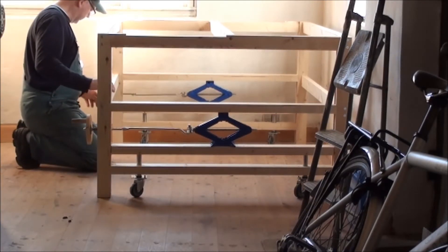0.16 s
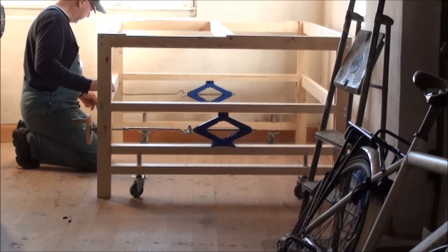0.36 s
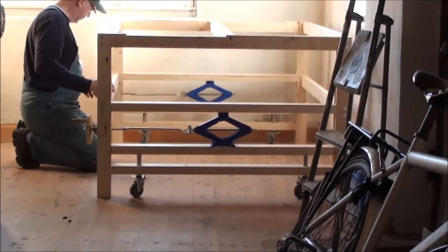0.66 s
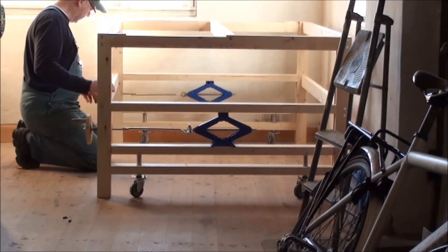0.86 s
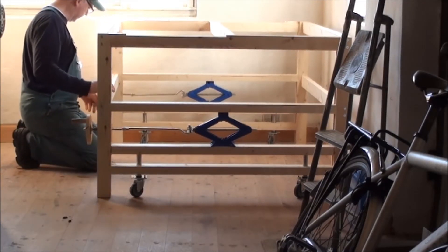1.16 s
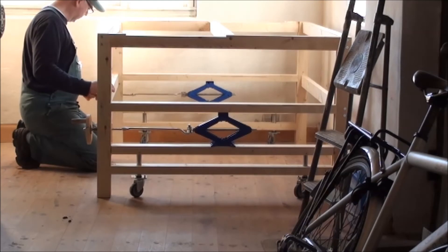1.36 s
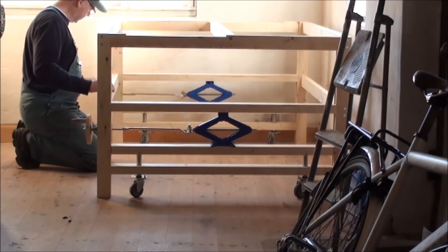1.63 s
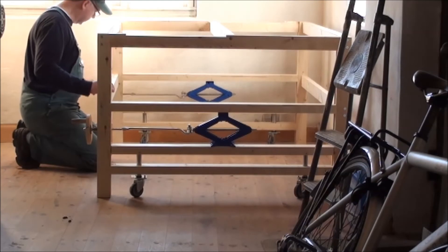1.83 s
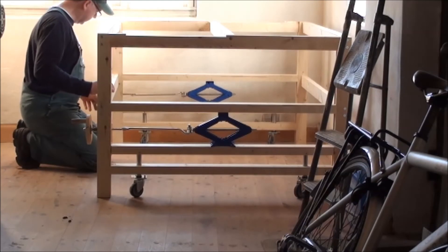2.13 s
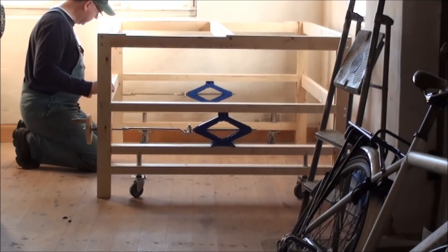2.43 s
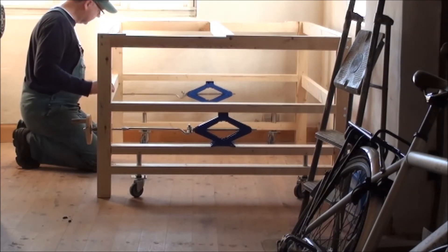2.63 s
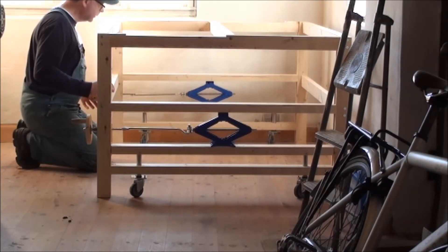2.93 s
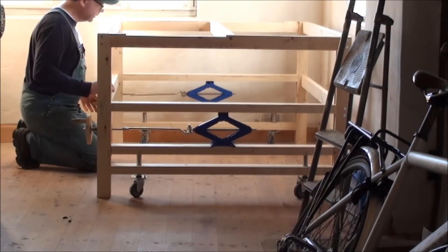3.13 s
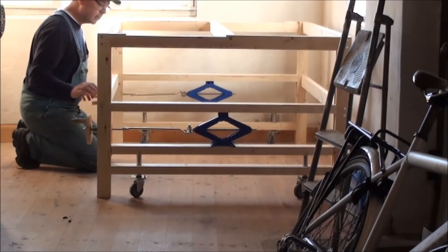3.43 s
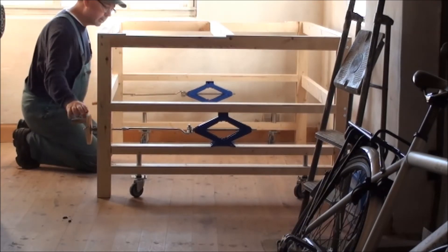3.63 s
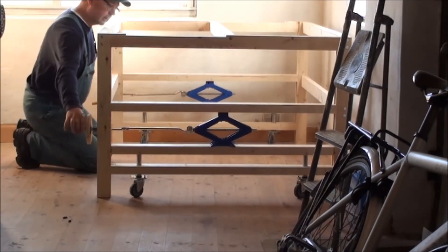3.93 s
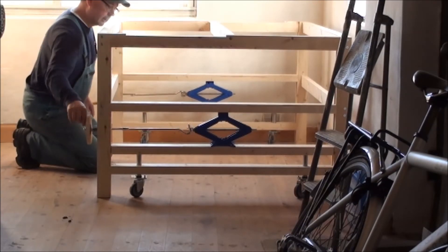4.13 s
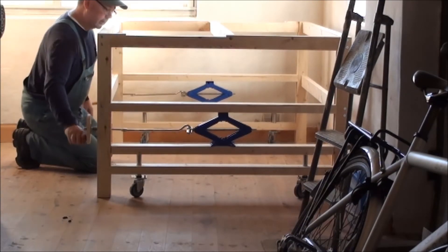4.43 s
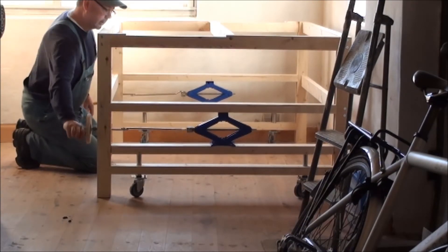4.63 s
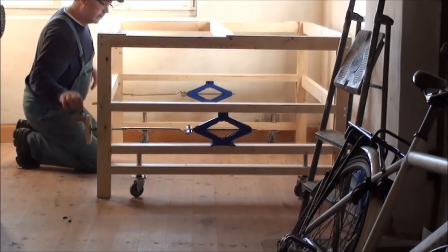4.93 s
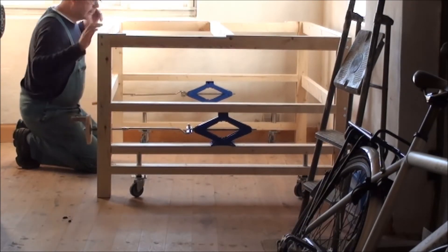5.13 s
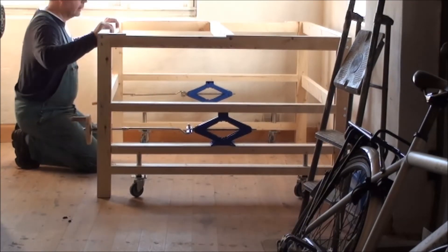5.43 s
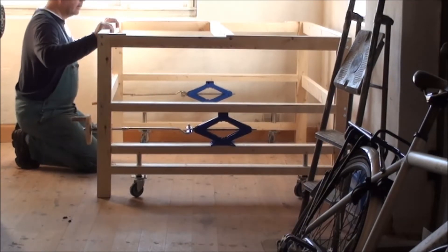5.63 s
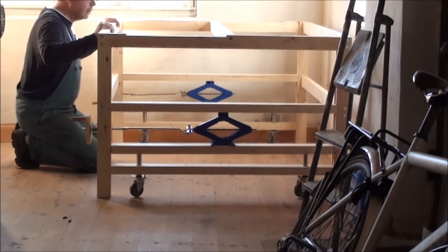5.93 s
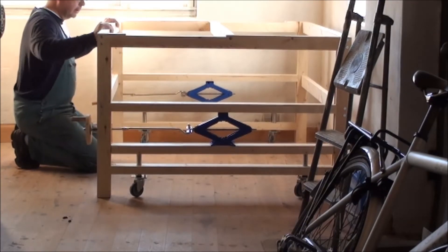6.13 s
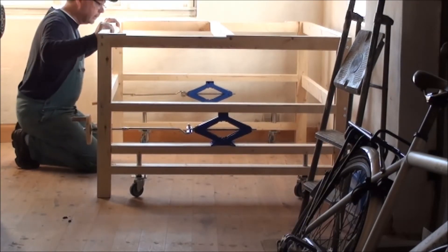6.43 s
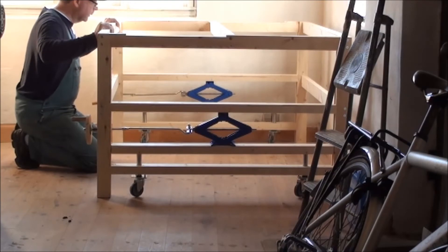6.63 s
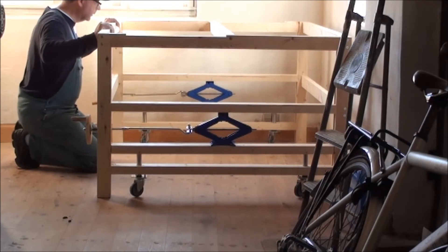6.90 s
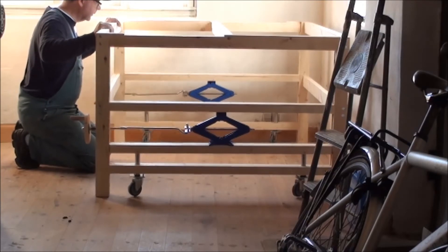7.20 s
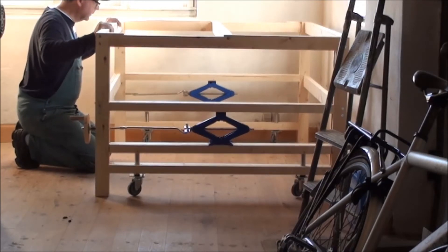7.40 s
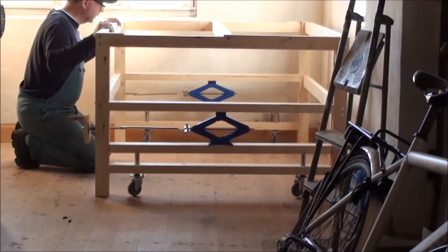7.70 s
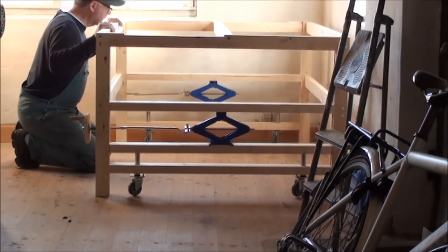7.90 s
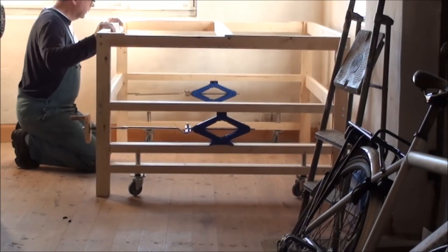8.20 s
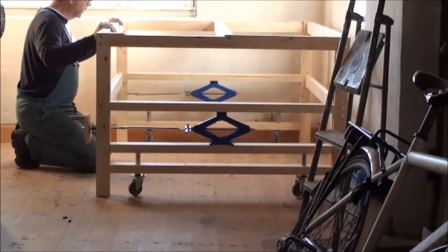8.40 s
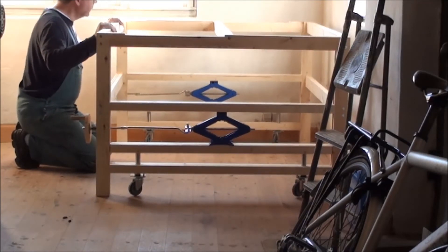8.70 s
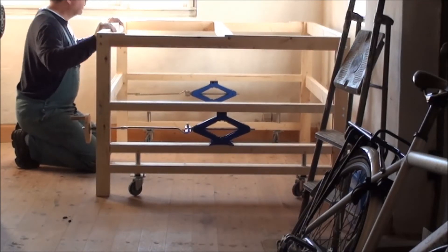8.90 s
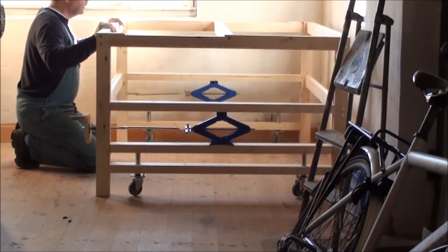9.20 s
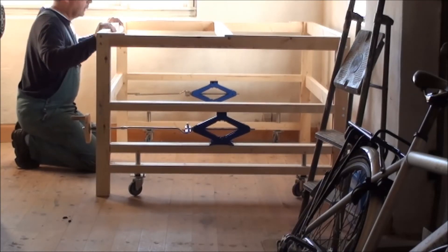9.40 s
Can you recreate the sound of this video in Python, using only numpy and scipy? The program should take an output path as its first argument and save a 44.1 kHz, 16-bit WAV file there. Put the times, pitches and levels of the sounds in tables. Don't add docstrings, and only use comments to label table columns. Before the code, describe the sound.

Hand-cranked steel jack clanks and knocks a wooden table in a live workshop, a squeak, heavy thumps, a castor scrape and sharp cracks.

```python
import sys
import numpy as np
from scipy import signal
from scipy.fft import rfft, irfft, next_fast_len
from scipy.io import wavfile
from scipy.ndimage import uniform_filter1d, map_coordinates

SR = 44100
rng = np.random.default_rng(int(sys.argv[2]) if len(sys.argv) > 2 else 0)


def store_wav(level_fs):
    pcm = np.round(np.clip(np.atleast_2d(level_fs), -1, 1) * 32767)
    wavfile.write(sys.argv[1], SR, pcm.T.astype(np.int16))


def convert_level_to_amplitude(level_db):
    exponent = np.asarray(level_db, float) / 20
    return 10 ** exponent


N = 421140


def unit(x):
    return x / np.sqrt(np.mean(x ** 2) + 1e-20)


def loudest(x):
    return x * np.sqrt(SR / 10) / np.linalg.norm(x)


def along(points, hz):
    f, v = np.transpose(points)
    return np.interp(np.log(hz + 1), np.log(f + 1), v)


def curves(rows):
    s, *cols = np.transpose(rows)
    return [np.interp(np.arange(N) / SR, s, c) for c in cols]


def wobble(rate_hz):
    knots = rng.standard_normal(int(N * rate_hz / SR) + 4)
    return map_coordinates(knots, [np.arange(N) * rate_hz / SR])


def filtered(x, response):
    m = next_fast_len(x.shape[-1] + 8192)
    return irfft(rfft(x, m) * response(np.fft.rfftfreq(m, 1 / SR)), m)[..., :x.shape[-1]]


def resonances(modes):
    def response(f):
        return sum((-1) ** k * convert_level_to_amplitude(db) * 1j * f * w / (c * c - f * f + 1j * f * w)
                   for k, (c, w, db) in enumerate(modes))
    return response


def noise(spectrum, side):
    def response(hz):
        return convert_level_to_amplitude(along(spectrum, hz)) * [np.ones_like(hz), convert_level_to_amplitude(along(side, hz))]
    mid, dif = filtered(rng.standard_normal((2, N)), response)
    return unit(np.array([mid + dif, mid - dif]))


def burst(seconds):
    t = np.arange(SR // 4) / SR
    fade = np.exp(-t / max(seconds, .001)) * (1 - np.exp(-t / 0.00082))
    z = rfft(rng.standard_normal(len(t)) * fade)
    return irfft(z / np.abs(z), len(t)) * np.sqrt(fade)


def add(out, s, x):
    part = out[:, round(s * SR):][:, :x.shape[1]]
    part += x[:, :part.shape[1]]


# (frequency [Hz], t60 [s])
ROOM_T60_S = [(50, 0.34), (150, 0.44), (400, 0.68), (1000, 0.51), (3000, 0.52), (7000, 0.37), (13000, 0.25)]
# (frequency [Hz], side minus mid [dB])
ROOM_SIDE_DB = [(60, -20), (250, -16.5), (1000, -13.5), (3000, -11), (8000, -13), (13000, -21)]
ECHO_SAMPLES = 3 * SR // 4


def workshop(x, direct_db):
    hz = np.fft.rfftfreq(256, 1 / SR)
    t = np.arange(ECHO_SAMPLES // 128 + 2) * 128 / SR
    z = rng.standard_normal((2, len(hz), 2 * len(t))).view(complex)
    z = z * convert_level_to_amplitude(-60 * t / along(ROOM_T60_S, hz)[:, None])
    z[1] *= convert_level_to_amplitude(along(ROOM_SIDE_DB, hz))[:, None]
    tail = signal.istft(z, SR, nperseg=256)[1][:, :ECHO_SAMPLES]
    tail = tail * (1 - np.exp(-np.arange(ECHO_SAMPLES) / SR / 0.0025))
    tail = tail / np.linalg.norm(tail[0])
    tail[0, 0] = convert_level_to_amplitude(direct_db)
    mid, dif = signal.fftconvolve(x[None], tail, axes=1)
    return np.array([mid + dif, mid - dif])


# (time [s], peak [dB], board share [dB], body [Hz], board [Hz])
KNOCKS = [(0.0, -24.5, 4, 168, 810), (0.199, -31.5, 2.5, 440, 756), (0.406, -34.5, 7, 264, 1200),
          (0.534, -28, 4.5, 169, 1490), (0.721, -25, 1.5, 186, 730), (3.793, -22, -24, 317, 1880),
          (4.018, -41, 7.5, 222, 1980), (4.121, -31.5, 5.5, 81.4, 1550), (4.151, -24, 0.5, 406, 964),
          (6.147, -8, -12, 313, 685), (6.219, -12.5, -52, 238.7, 738), (6.316, -19.5, -19, 221, 670),
          (7.281, -9.5, -30, 305, 810), (7.329, -14, -5.5, 208, 925), (7.418, -19, -7, 243, 1580),
          (7.914, -37, 21.5, 456, 2200), (7.984, -28.5, 6, 96.9, 890), (8.072, -35, 13, 304, 740)]
# (time [s], peak [dB], board share [dB], body [Hz])
NUDGES = [(0.628, -47, 23, 315), (0.875, -40, -14, 342), (1.218, -42.5, 12.5, 450), (1.326, -40.5, 2, 92),
          (1.54, -41.5, -7, 180), (1.815, -48.5, -1, 339), (1.933, -43.5, -2, 357), (2.065, -60, -10, 361),
          (2.404, -37, -13, 330), (2.593, -46, -21, 95), (2.703, -38.5, -1.5, 378), (2.81, -43, -5, 152),
          (3.217, -37.5, -4.5, 192), (3.249, -37.5, -7.5, 175), (4.731, -38, 2, 334),
          (5.062, -40.5, -5.5, 162), (5.389, -37, -11, 93), (5.429, -47.5, 4, 93.5), (5.977, -46, -3, 326)]
NUDGE_HZ = 810
# (time [s], peak [dB], board share [dB])
RAPS = [
    (6.137, -27, 9.4),
    (7.277, -32.5, 23.3),
    (7.905, -37, 15),
]
RAP_HZ, RAP_S = 706, 0.004
# (time [s], peak [dB])
BOUNCES = [
    (3.85, -65),
    (4.149, -54),
    (6.36, -23.5),
    (8.122, -35),
]
BOUNCE_HZ, BOUNCE_S = 53, 0.033
CONTACT_S, SOFTER_DB_PER_DB = 0.0047, 0.42


def frame_blows():
    blows = KNOCKS + [(*row, NUDGE_HZ) for row in NUDGES]
    blows = [(*row, CONTACT_S * convert_level_to_amplitude(-SOFTER_DB_PER_DB * row[1])) for row in blows]
    raps = [(*row, 440, RAP_HZ, RAP_S) for row in RAPS]
    bounces = [(*row, -30, BOUNCE_HZ, RAP_HZ, BOUNCE_S) for row in BOUNCES]
    return blows + raps + bounces


# (frequency [Hz], width [Hz], level [dB])
TABLE_MODES = [(55.6, 13, 0), (97, 17, -3.5), (140.5, 21.3, 2), (198, 25.2, 1.5), (280, 70, -4),
               (347.6, 32.6, 1), (456, 78, -5.5)]
# (frequency [Hz], width [Hz], level [dB])
BOARD_MODES = [(508, 860, -4.5), (760, 82, 5), (890, 68, 1.5), (1080, 244, 2), (1456, 330, -1.5),
               (1880, 180, 2.5), (2430, 990, -6.5)]


def knocks():
    out = np.zeros((2, N))
    table, boards = resonances(TABLE_MODES), resonances(BOARD_MODES)
    for s, db, board_db, body_hz, board_hz, contact_s in frame_blows():
        force = burst(contact_s)
        near = resonances([(body_hz, 0.35 * body_hz, 0)])
        rap = resonances([(board_hz, 0.55 * board_hz, 0)])
        body = filtered(force, lambda f: table(f) * (0.42 + near(f)) / (1 + 1j * f / 1500))
        board = filtered(force, lambda f: boards(f) * (0.086 + rap(f)) / (1 + 1j * f / (2.8 * board_hz)) ** 2)
        blow = loudest(body) + convert_level_to_amplitude(board_db - 4) * loudest(board)
        add(out, s, workshop(convert_level_to_amplitude(db - 14.0) * blow, direct_db=-1.0))
    return out


# (time [s], level [dB])
RESTLESS_DB = [(0, -71), (0.9, -58), (2.2, -64.5), (3.8, -67.5), (4.55, -61), (5.9, -62.5), (7, -63.5),
               (8.4, -66.5), (9.55, -70)]
# (time [s], thud [dB], cloth [dB], rise [dB/s], fall [dB/s])
SHIFTS = [
    (0, -35.5, -35, 60, 50),
    (.69, -39, -35.5, 48, 117),
    (2.66, -55.5, -56, 10, 13.5),
    (4.07, -44, -40.5, 106, 29),
    (6.33, -41.5, -73, 102.5, 57),
    (7.39, -31, -26, 159, 104),
    (8.08, -46, -36, 200, 104),
]
# (frequency [Hz], density [dB/Hz])
THUD_DB = [(18, -55), (30, -6), (92, -8), (162, -3.5), (238, -12), (357, -6), (397, -10), (700, -16),
           (910, -49), (1540, -120)]
# (frequency [Hz], density [dB/Hz])
CLOTH_SPECTRUM_DB = [(350, -49), (600, -1.5), (1090, 0.5), (1470, -9.5), (1680, -4.5), (5000, -15),
                     (6500, -41.5), (11000, -120)]
# (frequency [Hz], width [Hz], level [dB])
SCREW_MODES = [(1640, 70, 6), (1120, 50, 7)]
CLOTH_DB = -1.5


def shuffle():
    t, restless = np.arange(N) / SR, convert_level_to_amplitude(curves(RESTLESS_DB)[0])
    knees, sleeves = restless, restless * convert_level_to_amplitude(CLOTH_DB)
    for s, thud_db, cloth_db, rise, fall in SHIFTS:
        swell = convert_level_to_amplitude(-np.maximum(rise * (s - t), fall * (t - s)))
        knees = np.hypot(knees, convert_level_to_amplitude(thud_db) * swell)
        sleeves = np.hypot(sleeves, convert_level_to_amplitude(cloth_db) * swell)
    thud = knees * convert_level_to_amplitude(2.5 + 1.4 * wobble(8.3)) * noise(THUD_DB, ROOM_SIDE_DB)
    screw = resonances(SCREW_MODES)
    cloth = unit(filtered(noise(CLOTH_SPECTRUM_DB, ROOM_SIDE_DB), lambda f: 1 + screw(f)))
    return thud + sleeves * convert_level_to_amplitude(0.48 * wobble(11.0)) * cloth


# (time [s], hiss [dB])
GAIN_DB = [(0.0, -57), (0.24, -58.5), (2.4, -60), (3.56, -61.5), (4.65, -56.5), (6.1, -61), (7.32, -62.5),
           (7.5, -66.5), (9.55, -64.5)]
# (frequency [Hz], density [dB/Hz])
HISS_DB = [(18, -40.5), (30, -11), (270, 2), (300, -4), (411, 0), (1650, -4), (1830, -4), (2380, -4),
           (4450, -7), (5070, -6), (6420, -7), (7320, -6), (15600, -9.5)]
# (frequency [Hz], side minus mid [dB])
HISS_SIDE_DB = [(60, -18.5), (110, -16), (200, -6), (380, -0.5), (700, 1), (1290, 1), (2380, -3),
                (4400, -5.5), (8120, -8.5), (15000, -18)]
# (start [s], end [s], tick [dB])
FOCUS = [
    (1.442, 1.59, -45.5),
    (4.93, 5.31, -41.5),
    (5.697, 6.515, -44.5),
    (8.603, 9.546, -49),
]
# (time [s], peak [dB])
SNAPS = [
    (6.568, -30),
    (8.5664, -37),
    (8.975, -43),
]
# (frequency [Hz], width [Hz], level [dB])
HOUSING_MODES = [(2890, 470, -3), (4200, 400, -6.5), (5100, 260, -2), (7340, 870, 0), (8340, 1700, -4)]
TICKS_HZ = 50


def camera():
    steps = np.zeros(N)
    at = (np.arange(.0175, N / SR, 1 / TICKS_HZ) * SR).astype(int)
    hunting = sum(convert_level_to_amplitude(db) * (at > start * SR) * (at < end * SR) for start, end, db in FOCUS)
    steps[at] = hunting * convert_level_to_amplitude(1.8 * rng.standard_normal(len(at)))
    for s, db in SNAPS:
        steps[round(s * SR)] = convert_level_to_amplitude(db + 0.5)
    tick = filtered(burst(0.0016)[:SR // 50], resonances(HOUSING_MODES))
    ticks = signal.fftconvolve(steps, tick / np.abs(tick).max())[:N]
    return convert_level_to_amplitude(curves(GAIN_DB)[0] + 9) * noise(HISS_DB, HISS_SIDE_DB) + ticks


# (time [s], peak [dB], brightness [dB/octave], own ring [Hz], rattle [s])
CLANKS = [(0.0004, -14, 0, 2830, 0.0036), (0.18, -31, -3, 9350, 0.04), (0.3892, -30, 6.5, 4200, 0.044),
          (0.5178, -14.5, -3, 3070, 0.022), (0.7123, -17, -2, 5330, 0.0033),
          (3.175, -37, -3.5, 2660, 0.023), (3.7793, -12.5, -2.5, 4700, 0.049),
          (3.998, -31, -3, 2290, 0.017), (4.1092, -10.5, -2, 2870, 0.02), (5.1151, -24.5, 3, 5100, 0.0094),
          (5.362, -33.5, 1.5, 1630, 0.12), (5.579, -40.5, 5, 3450, 0.013), (5.973, -33, -1.5, 5100, 0.043),
          (7.2969, -14.5, 9, 2580, 0.02), (7.3475, -15.5, 11.5, 3590, 0.003),
          (7.908, -12.5, 12, 3950, 0.019), (7.9297, -13, -6.5, 2080, 0.026), (7.9888, -28, 1, 2400, 0.018),
          (8.075, -27, 6.5, 2900, 0.0062), (8.976, -42.5, 17, 4940, 0.013)]
# (time [s], peak [dB], brightness [dB/octave], own ring [Hz])
TOUCHES = [(1.214, -31.5, -5, 2560), (2.378, -35.5, -5.5, 1920), (2.70, -42.5, 3, 1800),
           (3.751, -16.5, -7, 4000), (3.764, -28.5, -3, 4200), (4.1, -37.5, 8.5, 4100),
           (4.731, -31, -5, 1700), (7.897, -26, -5.5, 3020)]
# (frequency [Hz], density [dB/Hz])
STEEL_DB = [(290, -19.5), (500, -5.5), (1220, -6), (1580, -6), (2160, -7), (2690, -6), (2970, -11),
            (4500, -5), (5130, -6.5), (6740, -4.5), (8000, -2.5), (15500, -29.5)]
# (frequency [Hz], density [dB/Hz])
CASTORS_DB = [(290, -39.5), (500, -14), (827, -32), (888, 9.5), (1040, -29), (1650, -6), (3060, -14.5),
              (7780, -9), (11500, -25), (14000, -41.5), (15500, -59)]
# (frequency [Hz], width [Hz], level [dB])
SHADOW_MODES = [(5210, 570, -4.5)]
ROD_HZ, TOUCH_S = 7640, 0.019
ROLLS_FROM_S = 7


def clanks():
    out = np.zeros((2, N))
    shadow = resonances(SHADOW_MODES)
    for s, db, tilt_db, low_hz, rattle_s in CLANKS + [(*row, TOUCH_S) for row in TOUCHES]:
        on_rod = s < ROLLS_FROM_S
        part = STEEL_DB if on_rod else CASTORS_DB
        rings = resonances([(low_hz, 600, 6), (ROD_HZ, 1200, 5)])

        def response(f):
            tilted = convert_level_to_amplitude(along(part, f) + tilt_db * np.log2((f + 1) / 5000))
            return tilted * (1 + rings(f)) * (1 - on_rod * shadow(f))

        force = loudest(burst(rattle_s)) + convert_level_to_amplitude(-7.0) * loudest(burst(0.00079))
        steel = loudest(filtered(force, response))
        add(out, s, workshop(convert_level_to_amplitude(db - 17.0) * steel, direct_db=-5.5))
    return out


# (time [s], frequency [Hz], level [dB], t60 [s])
RINGS = [(0.0012, 1686, -36.5, 0.17), (0.00089, 1149, -36.5, 0.028), (.001, 7100, -38, 0.067),
         (3.18, 3000, -61, 0.022), (5.118, 4200, -48, 0.13), (5.116, 5150, -50, 0.14),
         (5.125, 7600, -45.5, 0.045), (5.117, 11300, -51, .08), (7.2, 1205, -47, 0.19),
         (7.297, 5970, -35, 0.18), (7.348, 4090, -35, 0.47), (7.36, 1610, -29.5, 0.4),
         (4.528, 4490, -29, .1), (2.55, 1800, -74, .4), (3.05, 2000, -61, 0.43)]
# (time [s], frequency [Hz], level [dB], t60 [s])
BOOMS = [(0.209, 150.6, -44.5, 0.43), (1.861, 354.6, -52, 0.53), (2.592, 97, -46, 0.094),
         (2.703, 1120, -57, .14), (2.704, 364.5, -44.5, 0.49), (3.243, 158, -54, 0.27),
         (3.796, 309, -36, 0.25), (5.388, 88.4, -47.5, 0.26), (6.138, 760, -33, 0.05),
         (6.151, 97, -21.5, 0.15), (7.285, 97, -26.5, 0.15), (7.299, 198, -51, .4), (7.906, 802, -36, 0.15),
         (7.985, 894, -35, 0.6)]


def ringing():
    out, t = np.zeros((2, N)), np.arange(SR // 2) / SR
    for s, hz, db, t60 in RINGS + BOOMS:
        split, start = rng.standard_normal((2, 14, 1))
        modes_hz = hz * (1 + .021 * split)
        cluster = np.sin(2 * np.pi * (modes_hz * t + start)).sum(axis=0) * (1 - np.exp(-t / 0.0031))
        ring = workshop(convert_level_to_amplitude(-60 * t / t60) * cluster, direct_db=5.0)
        add(out, s, convert_level_to_amplitude(db + 3.0) * loudest(ring))
    return out


# (time [s], level [dB], rattle [s])
STRUCK = [
    (.518, -32.5, 0.0077),
    (.713, -34.5, .003),
    (3.778, -29, 0.004),
    (4.108, -24, .012),
    (7.909, -29, .015),
]
# (frequency [Hz], level [dB], t60 [s])
HANDLE = [(1444, -1, 0.24), (1658, -1, 0.41), (2821, -1.5, 0.34), (3295, -6, 0.13), (4420, -8.5, 0.26),
          (6020, -5.5, 0.15), (6632, -3.5, .3), (6930, -12, 0.57), (8020, -6, .2), (8600, -13, 0.17),
          (9180, -8, 0.13)]
SOCKET = [(1767, -4, 0.24), (2430, -7.5, 0.21), (3871, -8, 0.25), (4447, -14, .3), (5160, -3.5, .25),
          (5920, -10.5, .3), (6503, -0.5, 0.23), (7520, -2.5, 0.26), (8330, 0, 0.11)]
JACK_MODES = [(1850, -8.5, 0.36), (3224, -8.5, 1), (3940, -8.5, 0.52), (4210, -2.5, 0.42), (4550, -16, 0.43),
              (5680, -5, 0.19), (6200, -14, 0.24), (7040, -11, 0.34), (7710, -0.5, 0.073), (9470, -6, 0.1)]
ROD_MODES = [(1318, -15, 0.63), (1523, -1, .4), (2658, -6.5, 0.32), (3618, -4.5, 0.49), (4560, 1, 0.53),
             (5920, -9, 0.21), (6440, 0.5, 0.49), (6870, -11, 0.31), (6953, -6.5, 0.3), (7500, -10, 0.37),
             (8000, -11, 0.21)]
FORK = [(1200, -5, 0.17), (1413, -1, 0.57), (1700, -8.5, 0.37), (1962, -3.5, 0.25), (3225, -10.5, .4),
        (3950, -10, 0.23), (4608, -11, 0.24), (6100, -7, 0.35), (7200, -7, .18), (7994, -5, 0.18),
        (9000, -8, 0.18)]
DAMPED, SPREAD = .3, .022
STEEL_TOP_HZ = 10700


def chimes():
    out = np.zeros((2, N))
    for (s, db, rattle_s), modes in zip(STRUCK, [HANDLE, SOCKET, JACK_MODES, ROD_MODES, FORK]):
        bands = [(hz, np.log(1000) / np.pi / (DAMPED * t60) + SPREAD * hz, level) for hz, level, t60 in modes]
        part = resonances(bands)
        chime = filtered(burst(rattle_s), lambda f: part(f) / (1 + (f / STEEL_TOP_HZ) ** 6))
        add(out, s, workshop(convert_level_to_amplitude(db) * loudest(chime), direct_db=-7))
    return out


# (time [s], peak [dB], centre [Hz])
CRACKS = [(3.7648, -30, 12000), (4.116, -26, 4000), (4.54, -38, 10000), (7.2864, -22.5, 9000),
          (7.2972, -16, 9000), (7.325, -19, 8000), (7.348, -15.5, 9950), (7.9099, -3.5, 9000),
          (7.928, -14, 5000), (7.9431, -17, 4000), (7.968, -14.5, 3980), (8.0765, -21.5, 8970),
          (8.093, -25, 2500)]


def cracks():
    out, t = np.zeros((2, N)), np.arange(SR // 100) / SR
    for s, db, hz in CRACKS:
        push = np.sin(2 * np.pi * hz * t) * np.exp(-.9 * hz * t) * (1 - np.exp(-3 * hz * t))
        add(out, s, convert_level_to_amplitude(db - 5) * workshop(push, direct_db=8.5))
    return out


def chirp(s, length_s, first_hz, last_hz, db):
    edge_s, octave_db = 0.0036, -4.5
    at = np.array([0, edge_s, length_s - edge_s, length_s])
    hz = np.interp(at, [0, length_s], [first_hz, last_hz])
    return np.transpose([s + at, hz, db - np.array([32, 1.0, 2.5, 7.5]), np.full(4, octave_db)])


# (time [s], length [s], first pitch [Hz], last pitch [Hz], level [dB])
CHIRPS = [
    (3.998, 0.024, 2486, 1940, -30.5),
    (4.695, 0.037, 3620, 3540, -45),
]
# (time [s], pitch [Hz], level [dB], octave [dB])
LONG_SQUEAK = [(4.382, 3880, -47, -5), (4.388, 4096, -30.5, -2), (4.405, 4527, -30.5, 1.5),
               (4.425, 4684, -31.5, -5.5), (4.44, 4734, -23.5, -11.5), (4.458, 4740, -29.5, -2),
               (4.471, 4810, -41.5, 11), (4.488, 4693, -41, 5), (4.503, 4510, -32.5, 0),
               (4.517, 4480, -27, -2), (4.526, 4100, -31, -20), (4.536, 3350, -34.5, -10),
               (4.545, 2780, -35, 3)]
WAVER = [.35, .1, .19]
THIRDS_DB = [-6, -16.5, -21.5]
HALF_HZ, HALF_DB, HALF_SOFT_HZ = 4610, -10, 30
FLUTTER_DB = 2


def squeaks():
    out = np.zeros((2, N))
    for rows, waver, third_db in zip([chirp(*CHIRPS[0]), LONG_SQUEAK, chirp(*CHIRPS[1])], WAVER, THIRDS_DB):
        s, hz, *levels = np.transpose(rows)
        t = np.arange(s[0], s[-1], 1 / SR)
        pitch_hz = np.interp(t, s, hz)
        level, octave = [convert_level_to_amplitude(np.interp(t, s, db)) for db in levels]
        half = convert_level_to_amplitude(HALF_DB) * (1 + np.tanh((pitch_hz - HALF_HZ) / HALF_SOFT_HZ)) / 2
        jitter = uniform_filter1d(rng.standard_normal(len(t)), size=40) * waver
        phase = 2 * np.pi * np.cumsum(pitch_hz * (1 + jitter)) / SR
        upper = np.sin(3 * phase) + 0.46 * np.sin(4 * phase)
        tone = np.sin(phase) + octave * (np.sin(2 * phase) + convert_level_to_amplitude(third_db) * upper)
        flutter = unit(uniform_filter1d(rng.standard_normal(len(t)), size=350))
        level = level * convert_level_to_amplitude(FLUTTER_DB * flutter)
        halves = 0.07 * np.sin(phase / 2) + np.sin(phase * 3 / 2) + 0.33 * np.sin(phase * 5 / 2)
        add(out, s[0], workshop(convert_level_to_amplitude(1.5) * level * (tone + half * halves), direct_db=-2.5))
    return out


# (time [s], hiss [dB], board share [dB])
SCRAPE = [
    (7.03, -62, 0),
    (7.17, -38.5, 1.5),
    (7.215, -30, 2.5),
    (7.27, -41.5, 3.5),
    (7.296, -20, -1),
    (7.382, -20.5, -2),
    (7.46, -38.5, -4),
]


def scrape():
    before, after = (SCRAPE[0][0] - .02, -99, 0), (SCRAPE[-1][0] + 0.022, -99, 0)
    hiss_db, board_db = curves([before, *SCRAPE, after])
    grains = rng.standard_normal((2, N)) * convert_level_to_amplitude(0.41 * wobble(140))
    hiss = unit(filtered(grains[0], lambda f: convert_level_to_amplitude(along(CASTORS_DB, f))))
    board = unit(filtered(grains[1], lambda f: resonances(BOARD_MODES)(f) / (1 + 1j * f / 900)))
    return workshop(convert_level_to_amplitude(hiss_db - 5.5) * (hiss + convert_level_to_amplitude(board_db) * board), direct_db=-20)[:, :N]


def scene():
    blows = knocks() + clanks() + ringing() + chimes() + cracks()
    return blows + shuffle() + camera() + squeaks() + scrape()


def roll_off(x):
    return signal.sosfilt(signal.butter(12, 15790, fs=SR, output="sos"), x)


# (frequency [Hz], left minus right [dB])
LEAN_DB = [(40, -1), (100, -1.7), (300, -.5), (500, .3), (1000, 0)]


def record(dry):
    def capsules(hz):
        return convert_level_to_amplitude(along(LEAN_DB, hz) * np.array([[.5], [-.5]])) * (hz / (hz - 40j)) ** 2
    pair = filtered(dry, capsules)
    pair = pair / (1 + np.abs(pair / .52) ** 6) ** (1 / 6)
    pair = filtered(pair, lambda hz: hz < 15790)
    return roll_off(pair)


dry = scene()
out = record(dry)
store_wav(out)
```